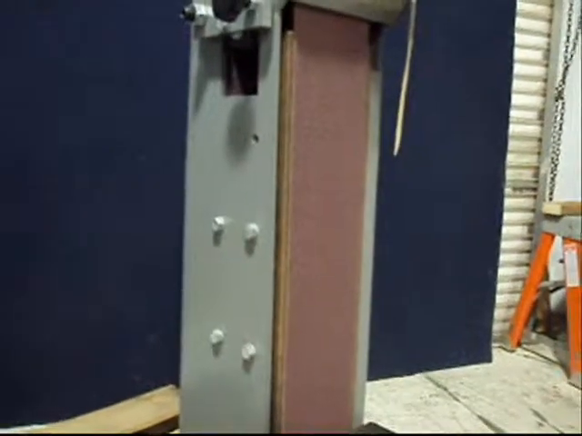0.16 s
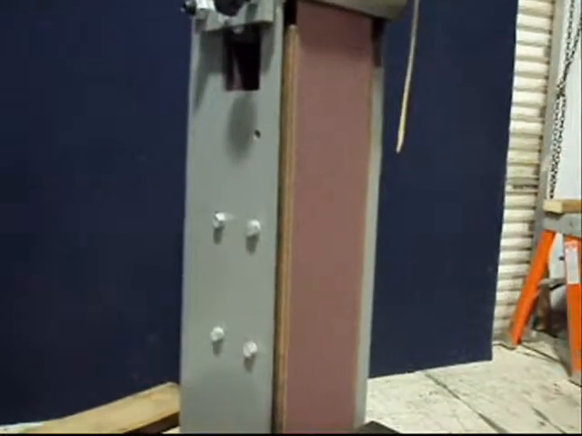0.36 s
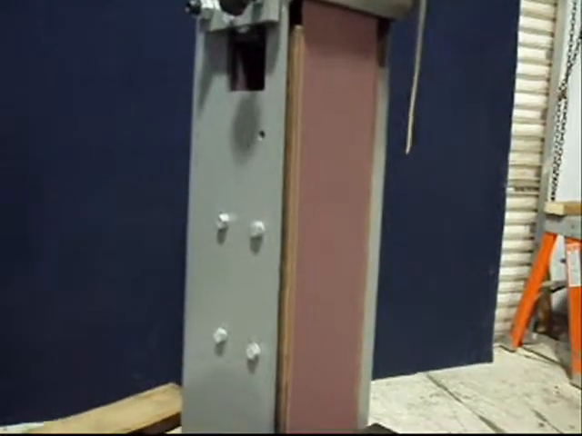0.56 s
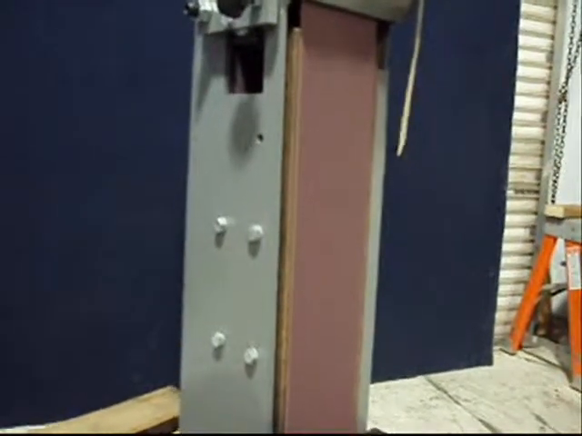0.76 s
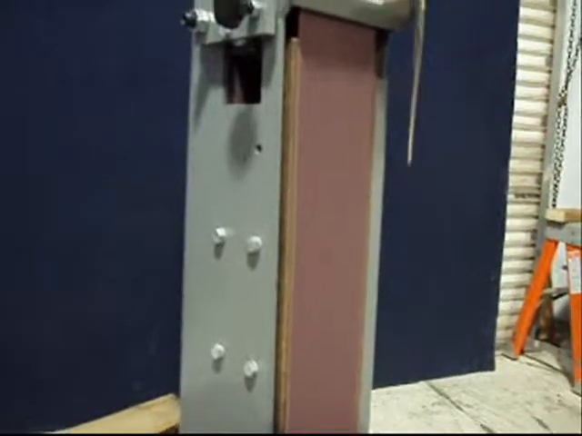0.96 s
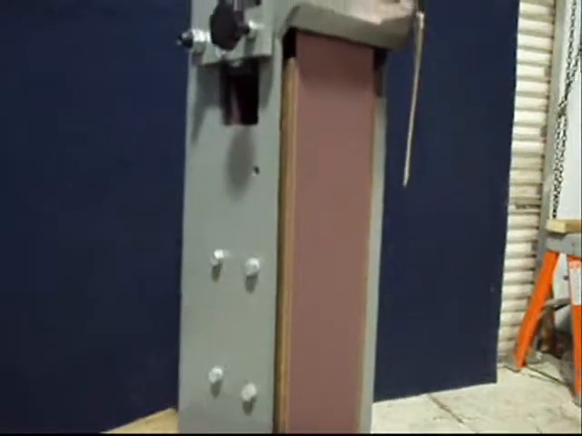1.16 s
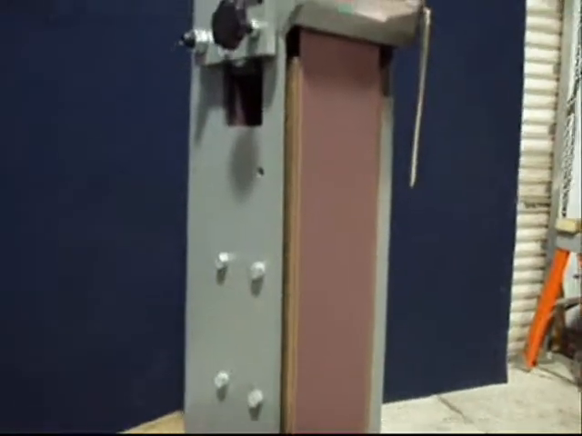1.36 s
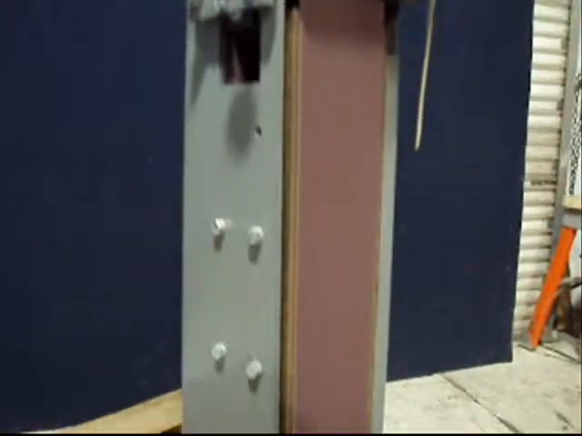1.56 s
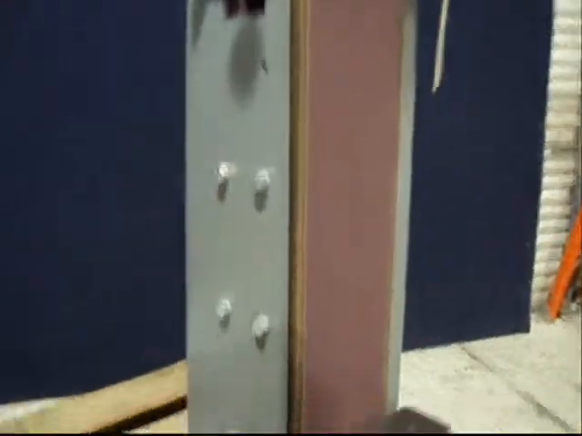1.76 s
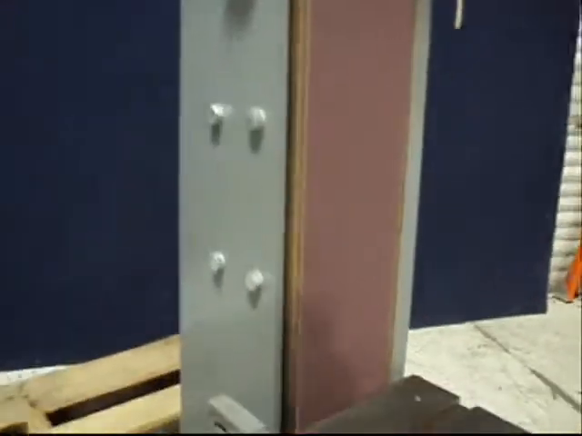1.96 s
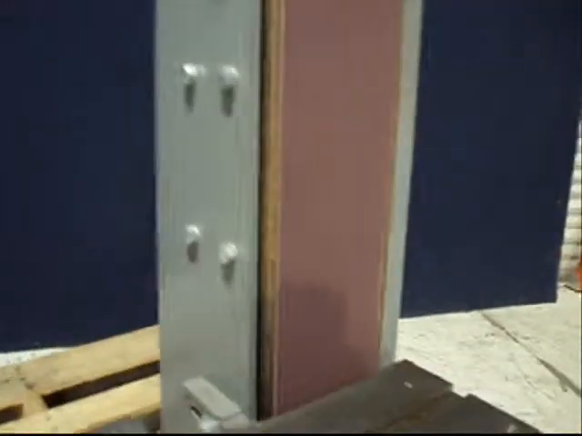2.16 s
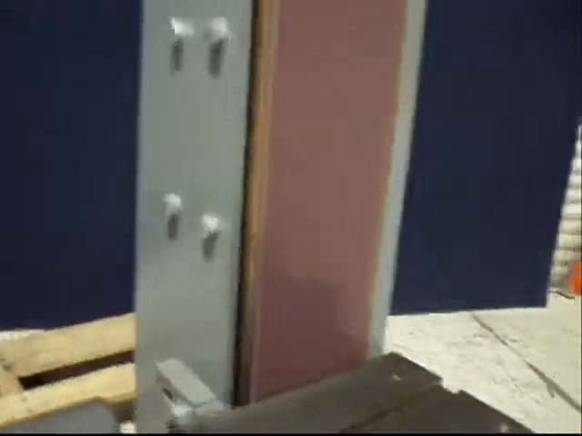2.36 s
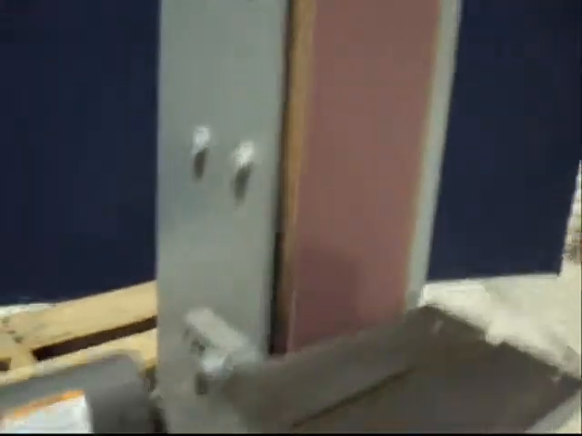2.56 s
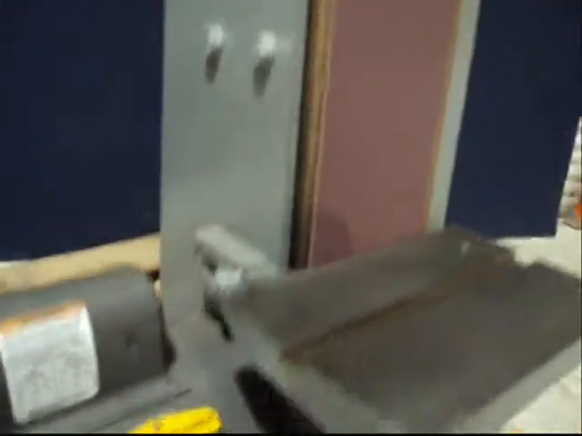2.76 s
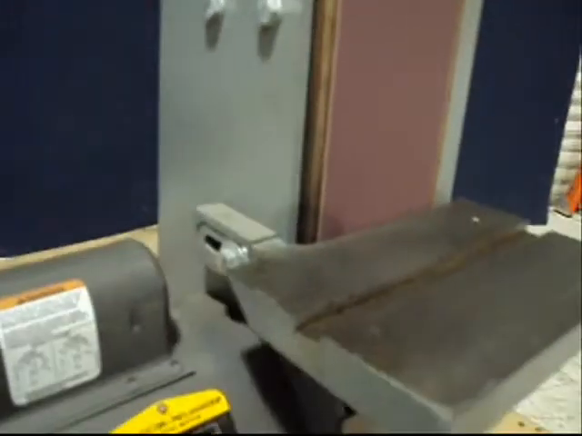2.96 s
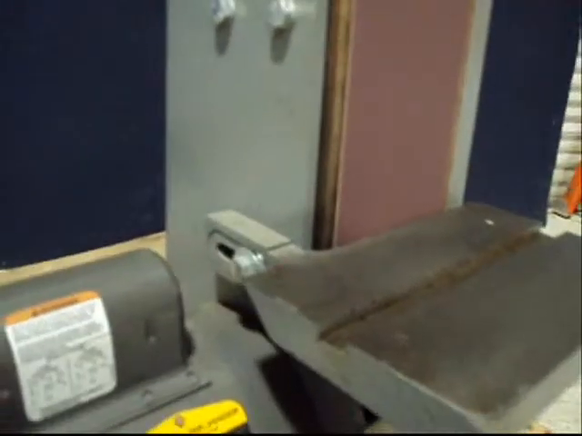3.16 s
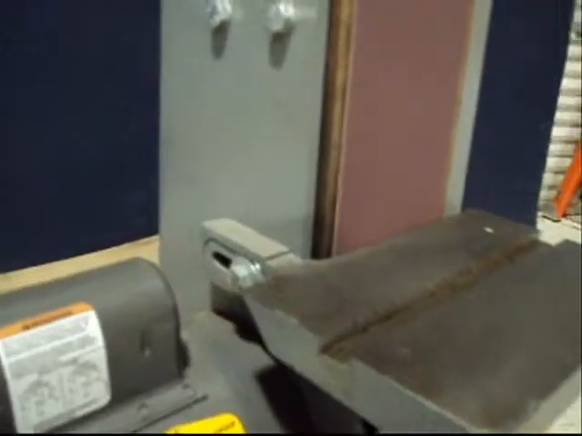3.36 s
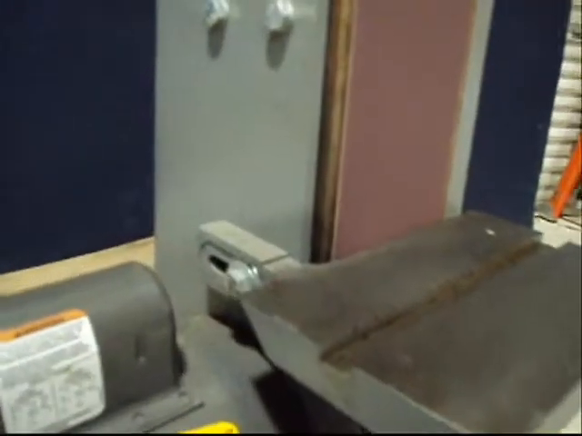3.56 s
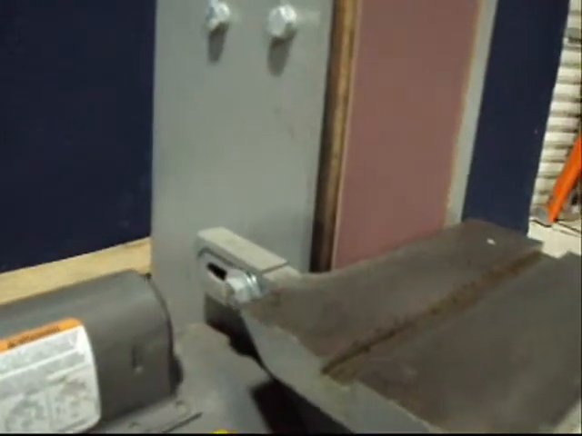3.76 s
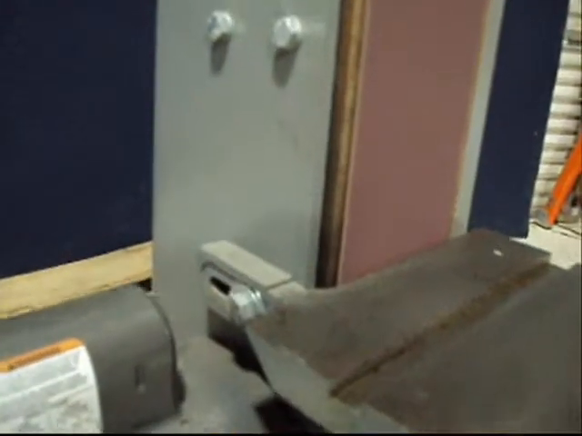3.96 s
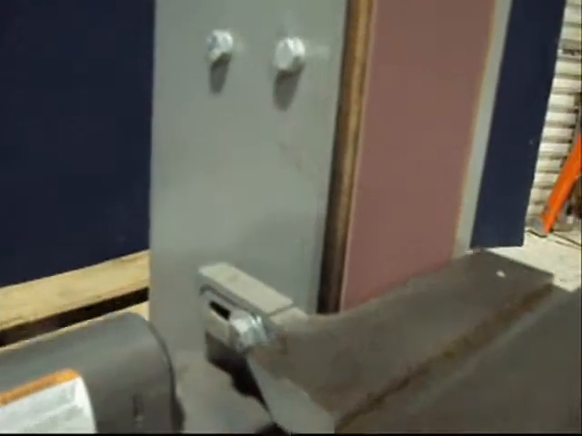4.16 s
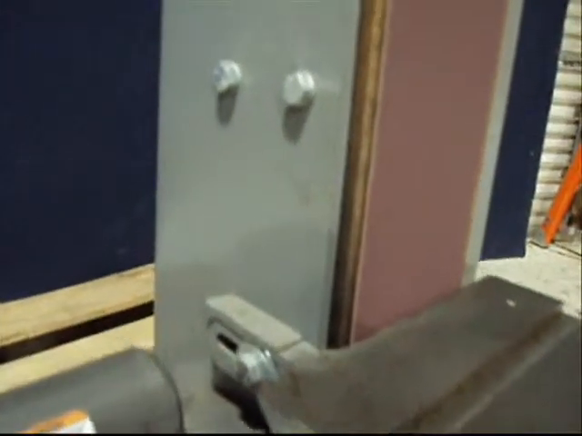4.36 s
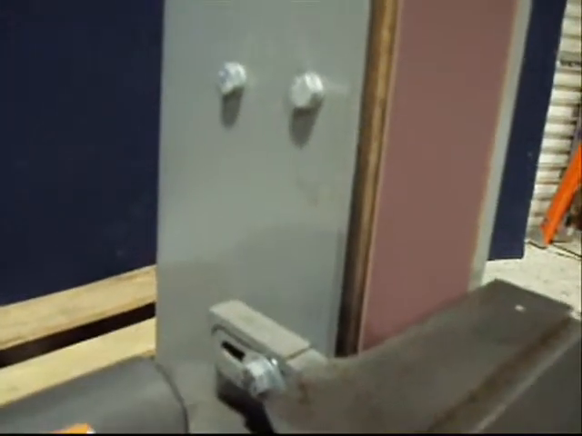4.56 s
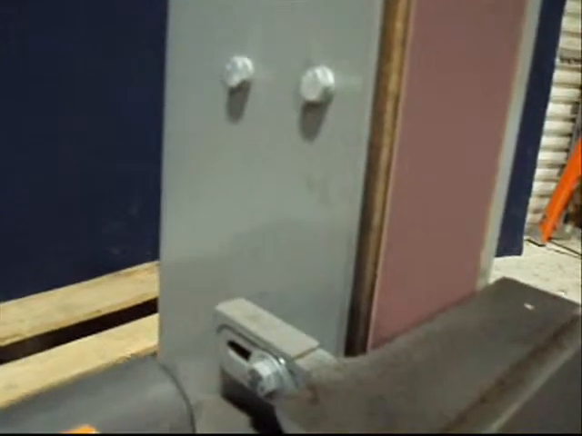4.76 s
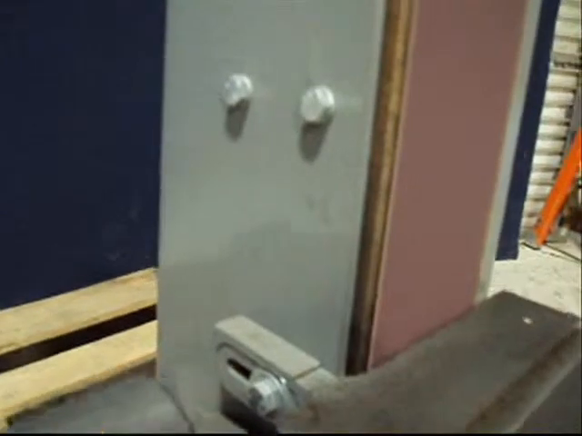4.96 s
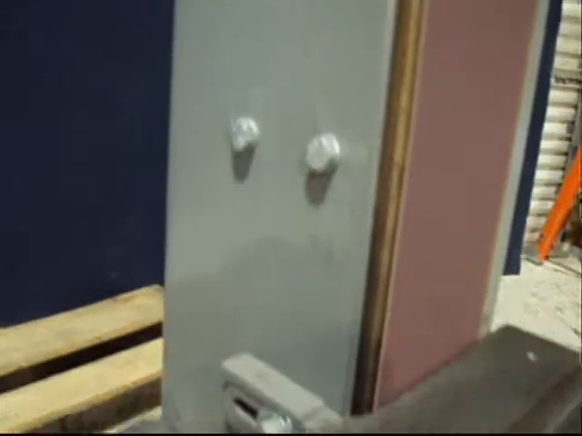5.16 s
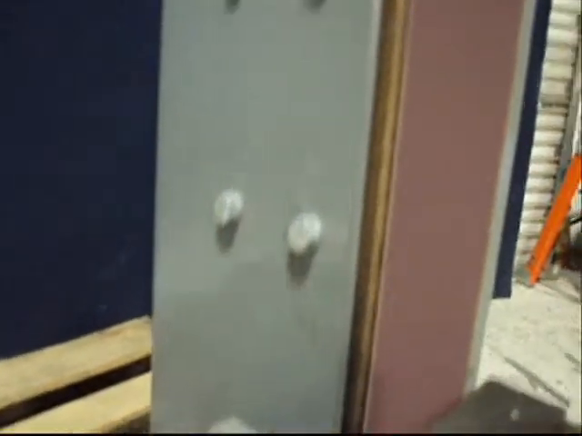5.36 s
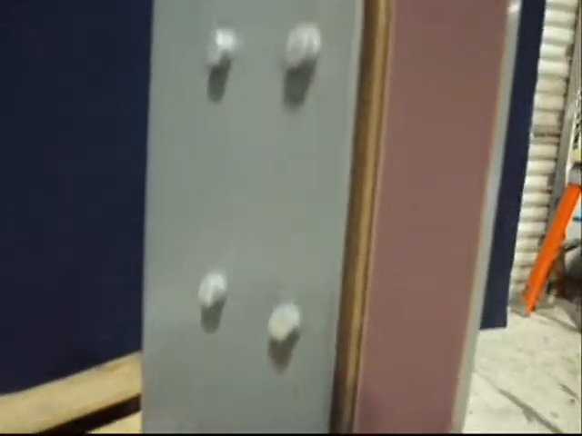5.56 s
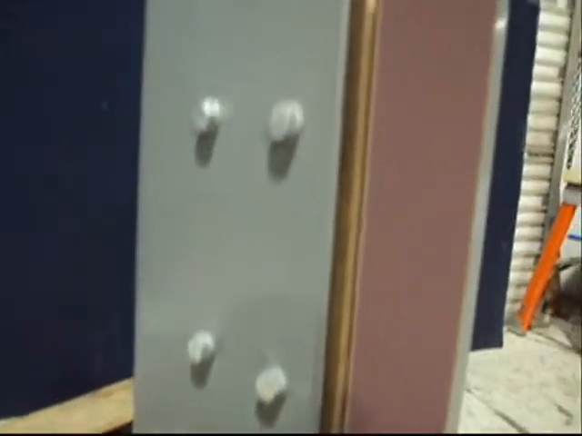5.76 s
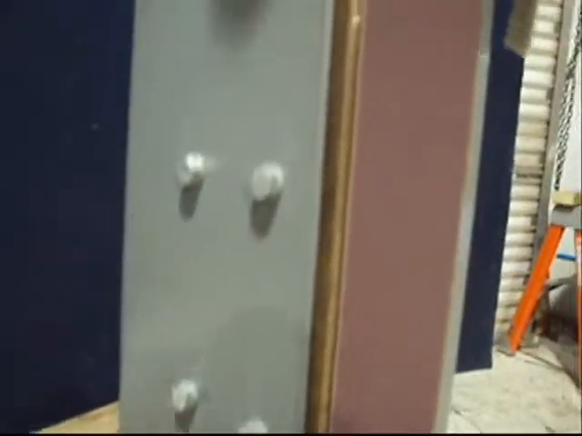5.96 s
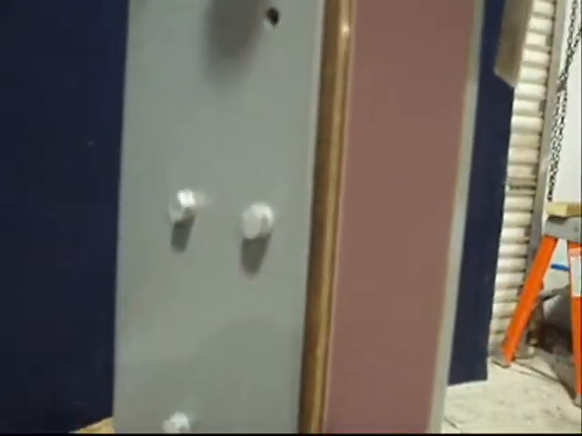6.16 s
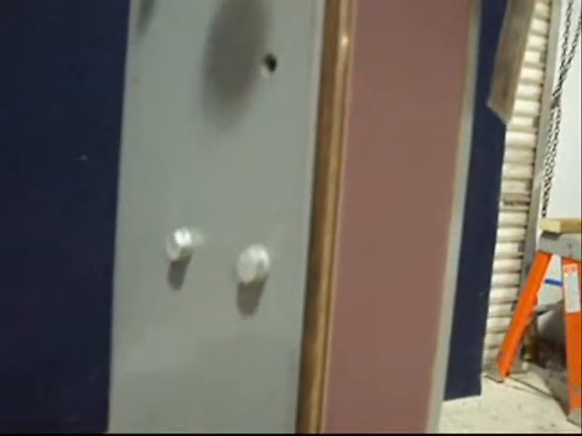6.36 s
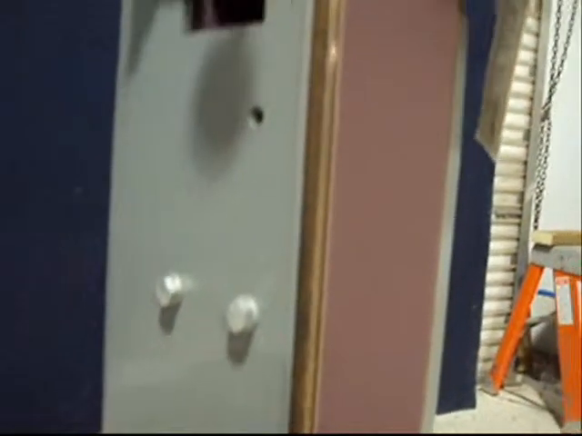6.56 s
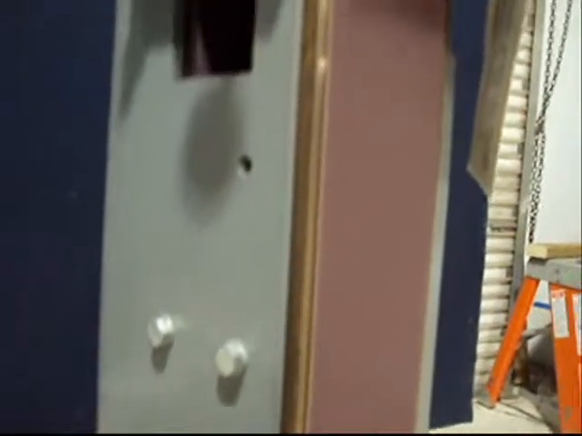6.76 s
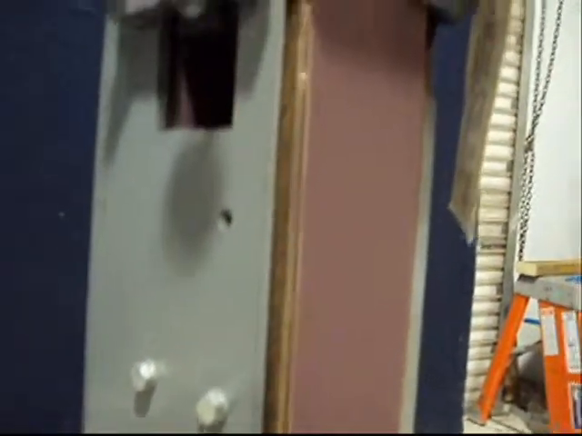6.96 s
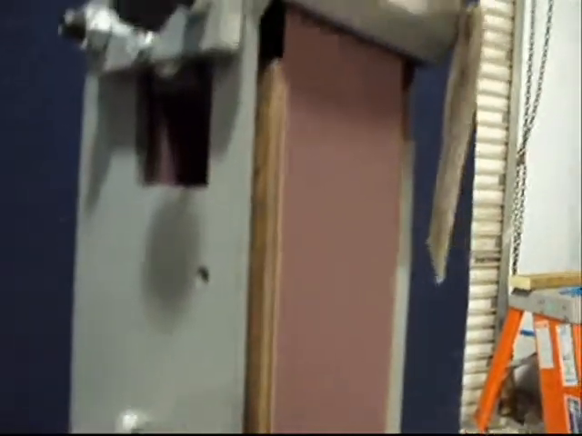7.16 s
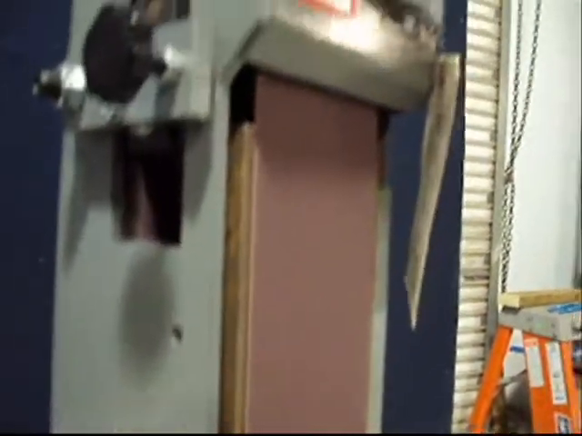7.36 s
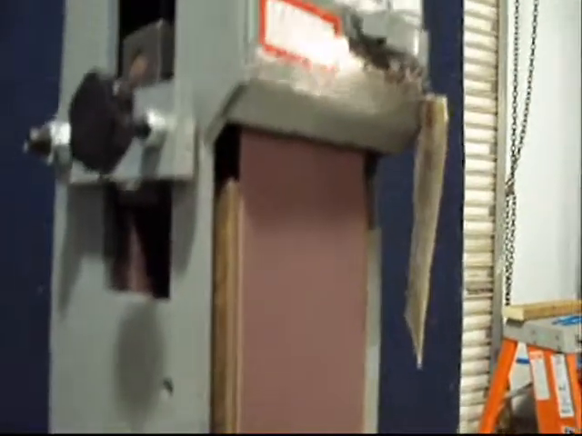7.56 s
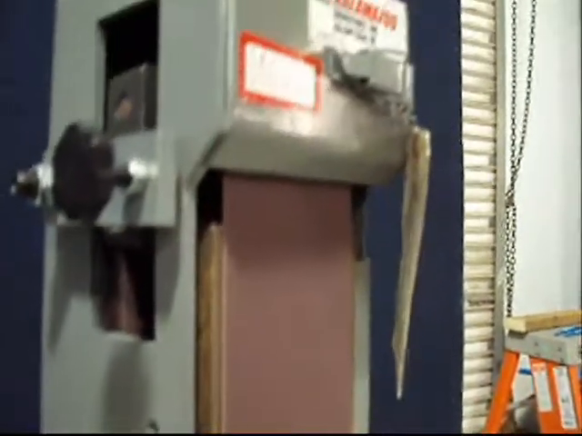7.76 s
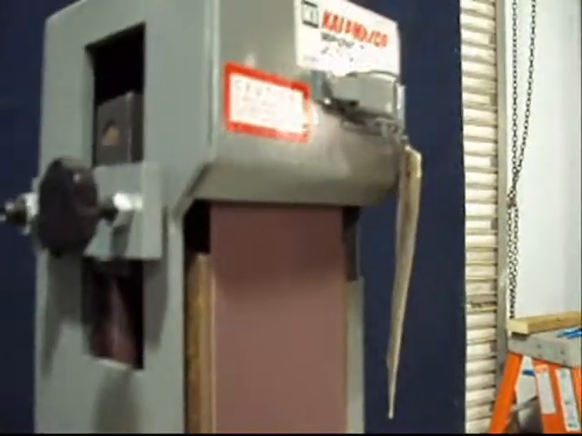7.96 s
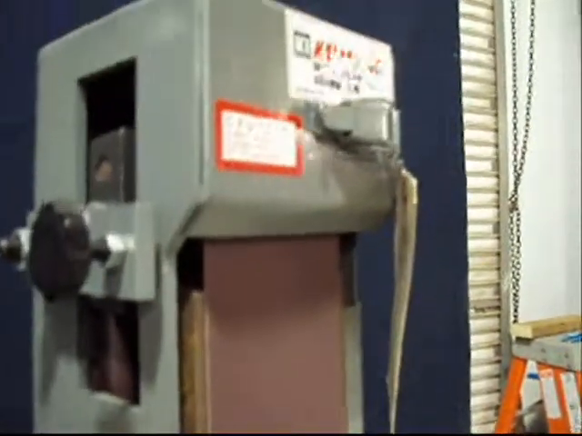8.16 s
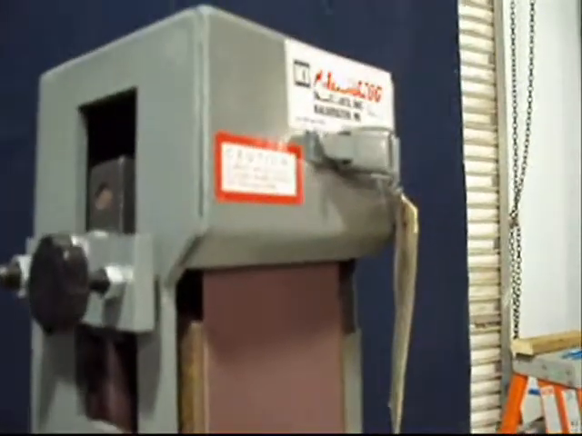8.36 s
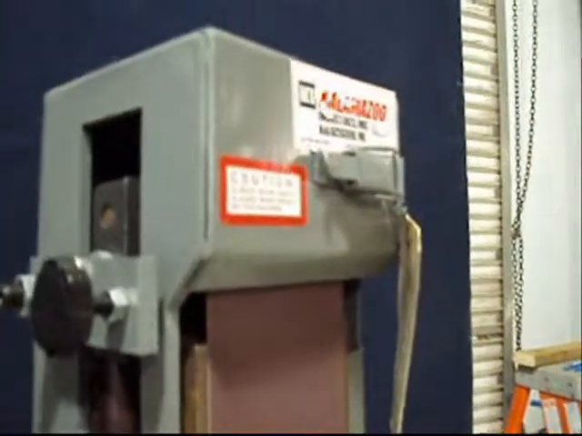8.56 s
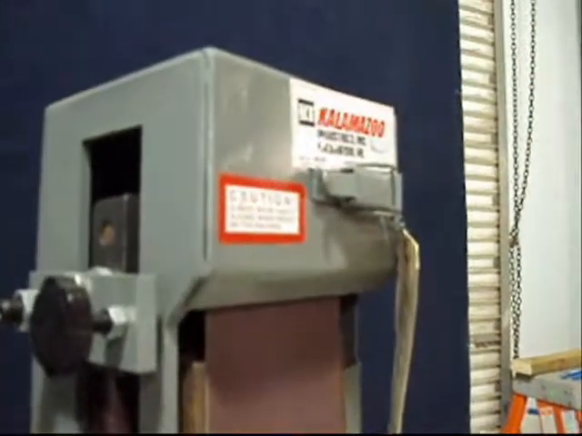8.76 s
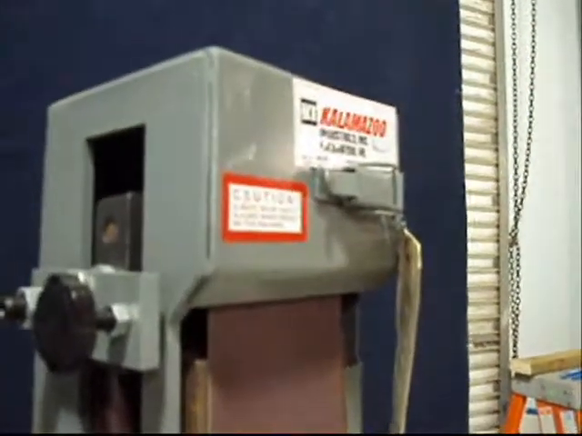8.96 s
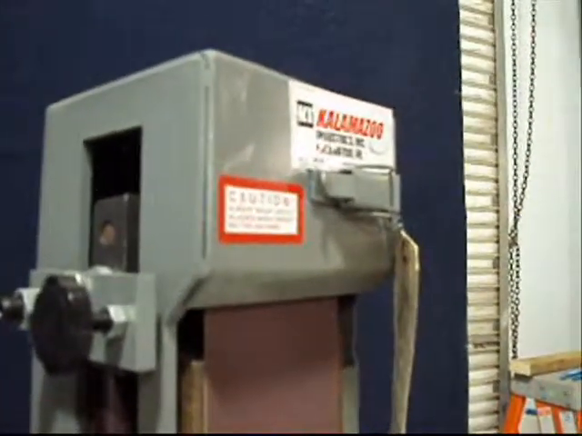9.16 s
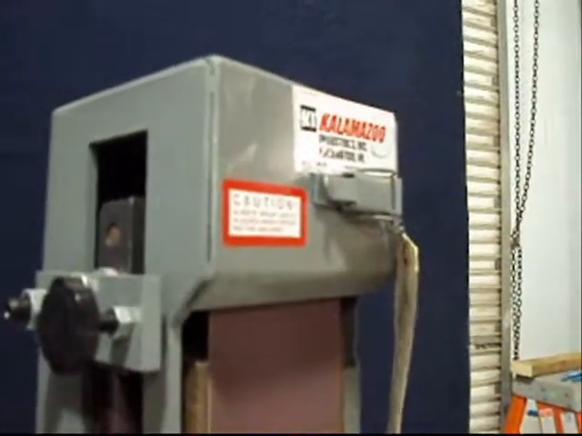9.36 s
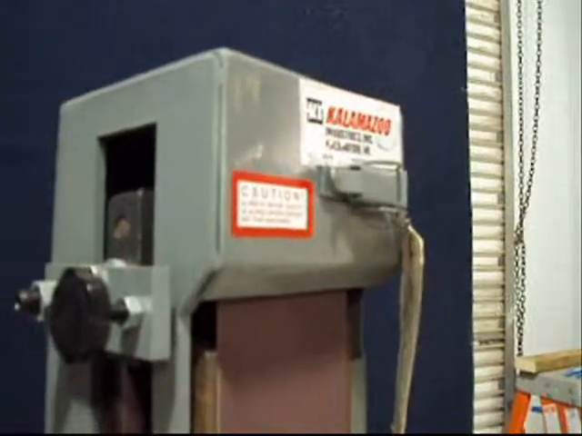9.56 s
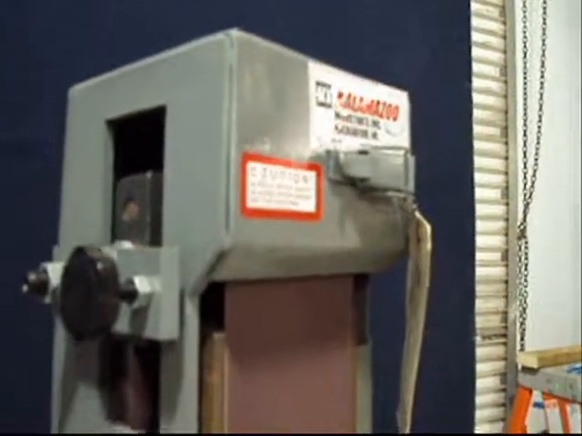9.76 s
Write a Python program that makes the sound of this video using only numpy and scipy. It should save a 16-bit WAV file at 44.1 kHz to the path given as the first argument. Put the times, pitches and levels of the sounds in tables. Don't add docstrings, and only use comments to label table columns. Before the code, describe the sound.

Indoor workshop with low distant ventilation. A sharp metallic switch clack with tiny bounces starts an upright belt sander; its motor buzzes, two short slaps click, and within half a second the belt is at full speed. It then runs steadily to the end, a gritty whirring roar with rapid flutter and motor hum, close to a moving, cheap hand-held microphone.

```python
import sys
import numpy as np
from scipy import signal
from scipy.fft import rfft, irfft
from scipy.io import wavfile
from scipy.ndimage import uniform_filter1d

SR = 44100
rng = np.random.default_rng(int(sys.argv[2]) if len(sys.argv) > 2 else 0)


def nominal_scale(level):
    x = np.asarray(level, float) / 20
    return 10 ** x


def dump(signal):
    limited = np.clip(np.atleast_2d(signal).T, -1, 1)
    pcm = np.round(limited * 32767).astype(np.int16)
    wavfile.write(sys.argv[1], SR, pcm)


N = 431738
TIME = np.arange(N) / SR
HZ = np.fft.rfftfreq(N, 1 / SR)
CAMERA_HZ = 11026
BEAM_DB = 45


def curves(table):
    s, *columns = np.transpose(table)
    return [np.interp(TIME, s, column) for column in columns]


def unit(x):
    return x / np.sqrt(np.mean(x ** 2))


def filtered_noise(gain):
    return unit(irfft(rfft(rng.standard_normal(N)) * gain, N))


def colour(points):
    hz, db = np.transpose(points)
    return nominal_scale(np.interp(np.log(HZ + 1), np.log(hz), db)) * (HZ < CAMERA_HZ / 2)


def walk(rate):
    k = int(SR / rate)
    held = np.repeat(rng.standard_normal(N // k + 1), k)
    return unit(uniform_filter1d(uniform_filter1d(held, k), k)[:N])


def reach_db(height_m, side_m, fall_db):
    # time_s, height_m, side_m
    camera_path = [
        (0.8, 0.75, -0.75),
        (2.0, 0.5, -0.75),
        (2.8, 0.25, -0.36),
        (4.0, 0.23, -0.09),
        (5.2, 0.33, 0.18),
        (6.2, 0.7, 0.28),
        (7.2, 0.94, 0.27),
        (8.3, 1.16, 0.1),
        (9.79, 1.24, 0.05),
    ]
    away_m = .5
    up_m, across_m = curves(camera_path)
    return -fall_db / 2 * np.log10((up_m - height_m) ** 2 + (across_m - side_m) ** 2 + away_m ** 2)


def shop():
    # freq_hz, level_db (per Hz)
    hum = [(15, -48), (25, -18), (33, -29), (145, -14.5), (178, -12), (401, -1), (722, -3.5), (845, -0.5),
           (1520, -7.5), (1860, -4.5), (2500, -21), (3270, -23), (5500, -35), (7150, -68), (12100, -120)]
    return nominal_scale(-35.5 + 2.2 * walk(1.4)) * filtered_noise(colour(hum))


def reflections(x, echo_db, longest_s):
    stations = [
        1.6,
        4.1,
        6.3,
        8.3,
    ]
    spectrum, out = rfft(x), 0
    for k in range(len(stations)):
        lag_s, sign = rng.uniform(0.001066, longest_s, 6), rng.choice([-1, 1], 6)
        echoes = sum(g * np.exp(-2j * np.pi * HZ * s) for s, g in zip(lag_s, sign))
        nearness = np.interp(TIME, stations, np.eye(len(stations))[k])
        out = out + np.sqrt(nearness) * irfft(spectrum * (1 + nominal_scale(echo_db) * echoes), N)
    return out * np.std(x) / np.std(out)


def switches():
    # start_s, peak_db
    clicks = [
        (.2906, -12.5),
        (.2945, -14),
        (.3006, -14),
        (.3074, -17),
    ]
    # freq_hz, level_db, t60_s
    box_modes = [(1100, 0, 0.0099), (1330, -4.5, 0.073), (1660, -5, 0.11), (1940, -10, 0.13),
                 (2070, -9.5, 5.0), (2643, -20, 0.073), (3418, -26, 0.033), (4040, -38, 0.099)]
    # start_s, peak_db, freq_hz
    slaps = [
        (.533, -16, 1950),
        (.580, -14, 1075),
    ]
    t, out = TIME[:SR // 4], np.zeros(N)
    shop_band = signal.butter(2, [400, 2600], "band", fs=SR)
    for s, db in clicks:
        ring = 0
        for hz, level_db, t60 in box_modes:
            decay = nominal_scale(level_db - 60 * t / min(t60, .035))
            ring = ring + decay * np.sin(2 * np.pi * (hz * t + rng.random()))
        tail = nominal_scale(-18 - 60 * t / .15) * signal.lfilter(*shop_band, rng.standard_normal(len(t)))
        crack = nominal_scale(-17 - 60 * t / .025) * rng.standard_normal(len(t))
        blow = ring / np.abs(ring).max() + tail + crack
        start = int(s * SR)
        out[start:start + len(t)] += nominal_scale(db) * blow * np.clip(t / 0.00062, 0, 1)
    for s, db, hz in slaps:
        start = int(s * SR)
        slap = nominal_scale(db - 60 * t / .04) * np.sin(2 * np.pi * hz * t)
        out[start:start + len(t)] += slap * np.clip(t / .001, 0, 1)
    return out


def tones(table, turns, waver_db, spread):
    out = 0
    for k, db, height_m, side_m in table:
        phase = rng.standard_normal() * (spread if k % 2 == 0 else 1) + .03 * walk(.5)
        level_db = db + reach_db(height_m, side_m, BEAM_DB) + waver_db * walk(1.51)
        out = out + nominal_scale(level_db) * np.cos(2 * np.pi * (k * turns + phase))
    return np.sqrt(2) * out


def motor(speed):
    # shaft_multiple, level_db (at 1 m), height_m, side_m
    shaft = [(1, -74, 0.6, -0.1), (2, -66, 0.6, -0.1), (3, -72, 0.7, -0.2), (7, -36, 0.5, 0.0),
             (13, -47, 0.8, 0.6), (14, -41, 0.0, -0.1), (17, -61, 0.0, 0.2), (19, -55, 0.5, -0.3),
             (21, -53, 0.5, -0.3), (23, -58, 0.5, -0.1), (32, -55, 0.3, -0.2), (33, -47, 1.2, -0.3),
             (34, -50, 0.9, -0.2), (35, -52, 1.0, -0.2), (39, -51, -0.1, 0.6)]
    # freq_hz (at full speed), level_db (at 1 m), height_m, side_m
    idler = [(213.3, -49, 0.5, 0.0), (269.2, -59.0, 0.4, -0.1), (272.4, -50.0, 0.6, -0.1),
             (294.1, -57.0, 0.5, -0.2), (332.4, -56.0, 0.7, -0.1), (356.0, -61.0, 0.3, -0.2),
             (703.2, -56.0, 0.7, 0.0), (719.3, -55.0, 0.8, 0.1), (803.5, -44.0, 0.1, 0.6),
             (852.9, -49.0, 1.0, -0.1), (1837.1, -57.0, 0.8, -0.1)]
    shaft_hz = 59.645
    run_s = np.cumsum(speed) / SR
    out = tones(shaft, shaft_hz * run_s, waver_db=1.0, spread=1)
    out = out + tones(idler, run_s, waver_db=2.0, spread=1)
    buzz_s, half_s, buzz_hz, width_hz, buzz_db = .5, .055, 725, 160, -32
    buzz = filtered_noise(1 / (1 + (2 * (HZ - buzz_hz) / width_hz) ** 4))
    swell = np.exp(-.5 * ((TIME - buzz_s) / half_s) ** 2)
    return out * speed ** 6 + nominal_scale(buzz_db) * swell * buzz


def flaps(turns):
    flap_turn = .465
    height_m, side_m = .5, .4
    peak_db, scatter_db = -22, 1.5
    hz, t60_s = 950, .018
    loop = np.floor(turns - flap_turn).astype(int)
    blows = np.diff(loop, prepend=loop[0]) * nominal_scale(scatter_db * rng.standard_normal(256))[loop]
    t = TIME[:SR // 10]
    ring = -nominal_scale(-60 * t / t60_s) * np.sin(2 * np.pi * hz * t) * np.clip(t / .0005, 0, 1)
    return nominal_scale(peak_db + reach_db(height_m, side_m, BEAM_DB)) * signal.fftconvolve(blows, ring)[:N]


def surface(turns, memory, repeat, grain_db, lumps):
    size, loops = 4096, int(turns[-1]) + 2
    memory, repeat = np.clip(memory, 0, .99), np.clip(repeat, 0, 1)
    fresh = rng.standard_normal((loops + 64, size + lumps))
    worn = signal.lfilter([np.sqrt(1 - memory ** 2)], [1, -memory], fresh, axis=0)[64:]
    row, place = turns.astype(int), turns % 1
    coarse = nominal_scale(grain_db * worn[row, size + (place * lumps).astype(int)])
    grit = worn[row, (place * size).astype(int)]
    return coarse * (np.sqrt(repeat) * grit + np.sqrt(1 - repeat) * rng.standard_normal(N))


def belt(speed):
    # freq_hz, level_db (per Hz)
    machine = [(15, -70), (25, -43), (145, -19.5), (213, -11), (328, -8), (410, -3), (449, -8), (722, -7),
               (808, -6.5), (904, -14.5), (1490, -14.5), (1820, -12.5), (2550, -26.5), (3060, -26.5),
               (5500, -27.5), (7150, -64), (12100, -120)]
    # freq_hz, width_hz, boost_db
    rings = [(249, 30, 5.5), (277, 14, -2), (385, 49, -2), (420, 10, -3.5), (1255, 43, 5.5),
             (1516, 110, -5.5), (514, 40, 3.5), (827, 45, 8.5), (1080, 70, 3), (1630, 23, 3), (1740, 84, 0),
             (2003, 145, 2.5), (2976, 77, 3.5), (3130, 19, 5), (3600, 230, 2), (2490, 130, -4),
             (4400, 330, -4)]
    part_edges = [200, 430, 760, 900, 1250, 2400, 4300]
    # height_m, side_m, level_db (at 1 m),
    # swell_db (as the joint passes), speed_db (per tenfold speed)
    machine_parts = [(0.45, -0.0041, -47.5, 0.5, 52), (0.53, -0.032, -33.5, 2, 22),
                     (0.77, -0.03, -30.5, 1.1, 19), (0.38, 0.039, -33, 1, 15), (0.58, -0.3, -29, 2, 29),
                     (0.69, -0.15, -27, -0.4, 27), (0.52, -0.051, -37.5, -0.1, 24),
                     (0.66, -0.12, -45, -1, 22)]
    # loop_multiple, level_db (at 1 m), height_m, side_m
    knocks = [(31, -47, 0.9, 0.0), (32, -47, 0.9, -0.1), (33, -46, 1.2, 0.0), (40, -42, 1.0, -0.2),
              (41, -46, 0.6, -0.2), (44, -46, 1.1, 0.0), (46, -48, 1.0, 0.5), (50, -48, 0.9, -0.1),
              (52, -50, 0.7, 0.1), (58, -48, 1.1, -0.2), (63, -50, 0.9, -0.1), (64, -45, 0.8, 0.4),
              (66, -39, 0.6, 0.3), (68, -49, 0.3, 0.0), (70, -48, 0.9, -0.3), (77, -45, 0.5, -0.1),
              (81, -47, 0.6, -0.2), (82, -46, 1.0, -0.2), (83, -47, 0.8, -0.1), (85, -42, 0.8, -0.1),
              (86, -42, 0.9, -0.1), (87, -45, 0.9, -0.2), (89, -50, 0.9, -0.1), (92, -43, 1.1, -0.4),
              (94, -48, 0.9, -0.3), (142, -46, 0.9, -0.2), (145, -49, 0.7, 0.1), (152, -49, 1.1, -0.2),
              (168, -50, 1.2, -0.3), (253, -57, 0.7, 0.3)]
    belt_hz, seam_turn = 12.430, .02
    room_db = -2.5

    late_s = np.cumsum((1 - speed)[::-1])[::-1] / SR
    turns = belt_hz * (TIME + late_s) + .0005 * walk(1.5)
    joint = np.cos(4 * np.pi * (turns - seam_turn))

    boost_db = sum(db / (1 + (2 * (HZ - hz) / width) ** 2) for hz, width, db in rings)
    body = colour(machine) * nominal_scale(boost_db)
    rough = rfft(surface(turns, memory=.97, repeat=.5, grain_db=2.0, lumps=60)) * body
    fine = rfft(surface(turns, memory=.93, repeat=.42, grain_db=1.9, lumps=200)) * body

    below = [0] + [1 / (1 + (HZ / edge) ** 40) for edge in part_edges] + [1]
    heard = []
    for k, (height_m, side_m, db, swell_db, speed_db) in enumerate(machine_parts):
        band = (rough if k < 5 else fine) * (below[k + 1] - below[k])
        level_db = db + reach_db(height_m, side_m, 15.2) + swell_db * joint + speed_db * np.log10(speed)
        heard.append(nominal_scale(level_db + .5 * walk(6)) * unit(irfft(band, N)))

    room = np.sqrt(1 + (nominal_scale(room_db) / nominal_scale(reach_db(0.42, 0, 21))) ** 2)
    out = sum(heard[:5]) + reflections(room * sum(heard[5:]), echo_db=-17, longest_s=.012)
    out += speed ** 4 * tones(knocks, turns - seam_turn - .5, waver_db=1.2, spread=.1)
    out += speed ** 4 * flaps(turns)
    return out * np.clip((TIME - .3) / 0.022, 0, 1)


def scene():
    # time_s, speed (share of full speed)
    run_up = [(.3, .08), (.45, .4), (.59, .7), (.63, .85), (.67, .94), (.72, .975), (.78, 1), (9.79, 1)]
    speed = curves(run_up)[0]
    return (shop() + switches() + motor(speed) + belt(speed))[None]


def band_limit(x):
    return signal.sosfilt(signal.butter(12, 15800, fs=SR, output="sos"), x)


def record(dry):
    seconds, top_hz = 10, 15735
    square = dry[0] ** 2
    lopsided = dry[0] - .2 * (square - uniform_filter1d(square, size=512))
    slow = signal.resample(np.pad(lopsided, (0, seconds * SR - N)), seconds * CAMERA_HZ)
    held = rfft(np.roll(np.repeat(slow, 4), 2))[:seconds * top_hz]
    mix = irfft(held, seconds * SR)[None, :N] + 0.0016
    return band_limit(mix)


dry = scene()
out = record(dry)
dump(out)
```